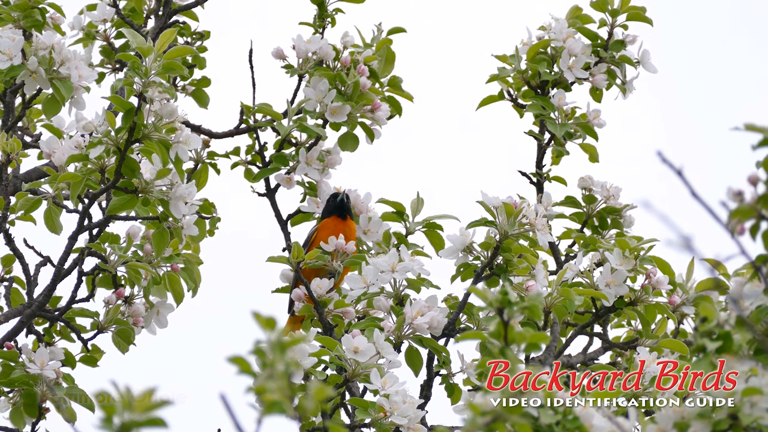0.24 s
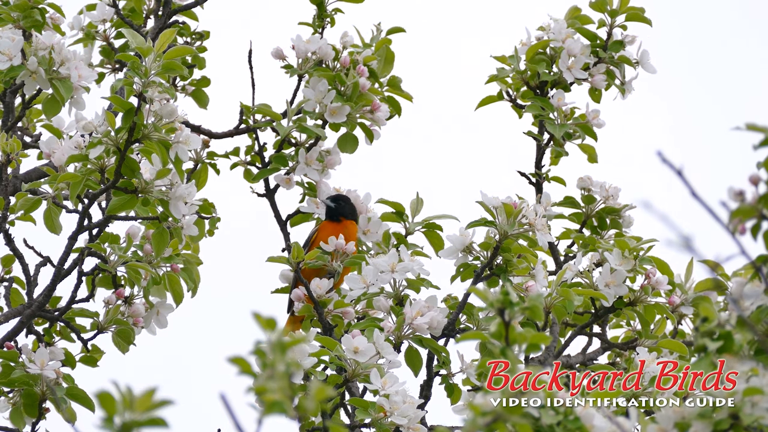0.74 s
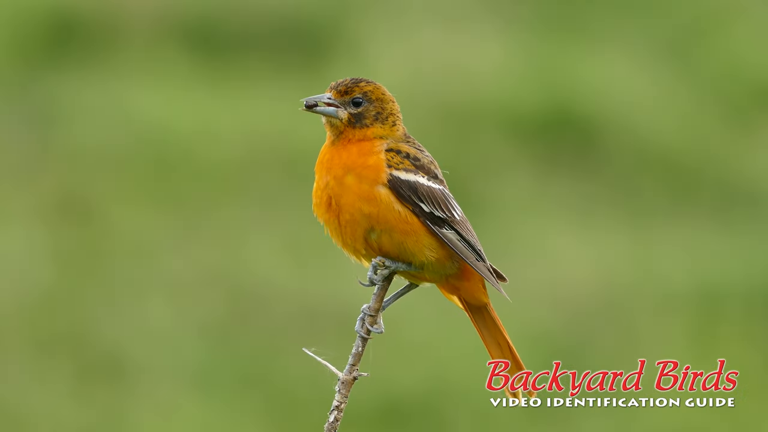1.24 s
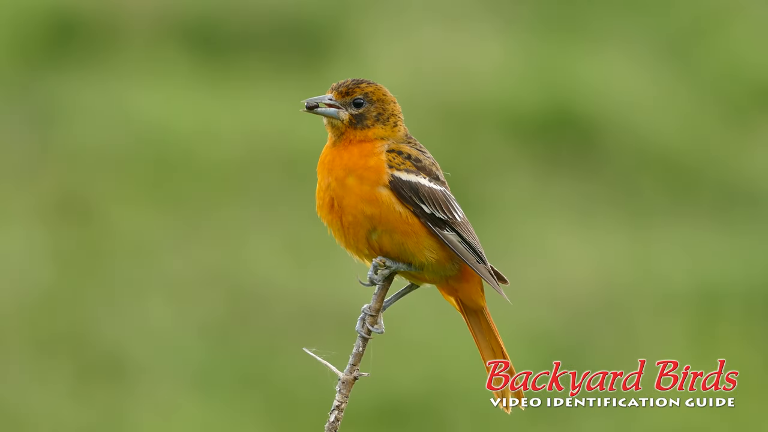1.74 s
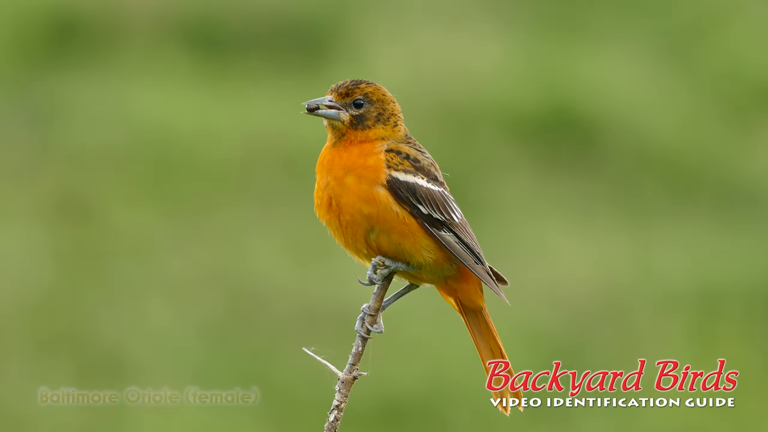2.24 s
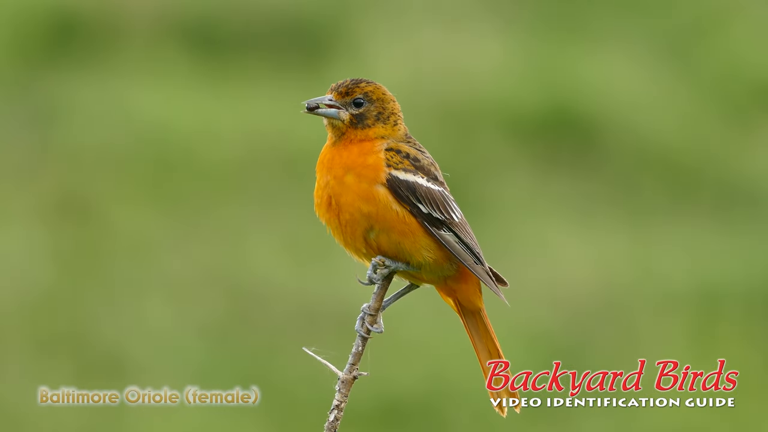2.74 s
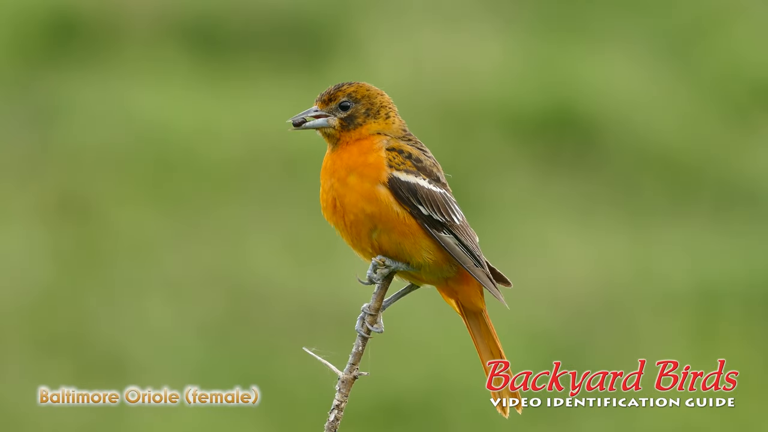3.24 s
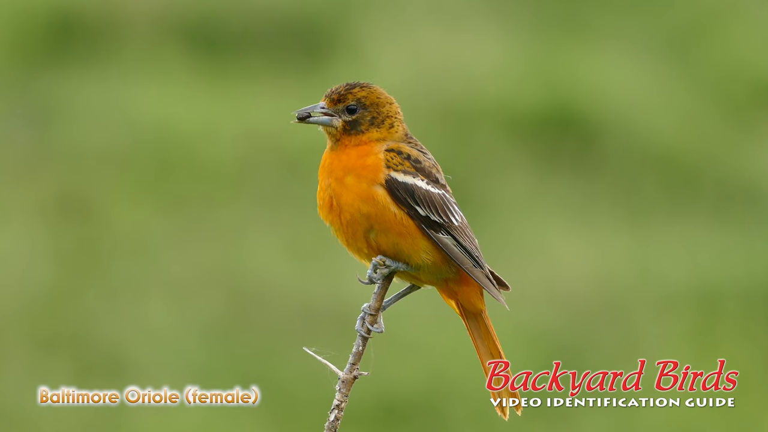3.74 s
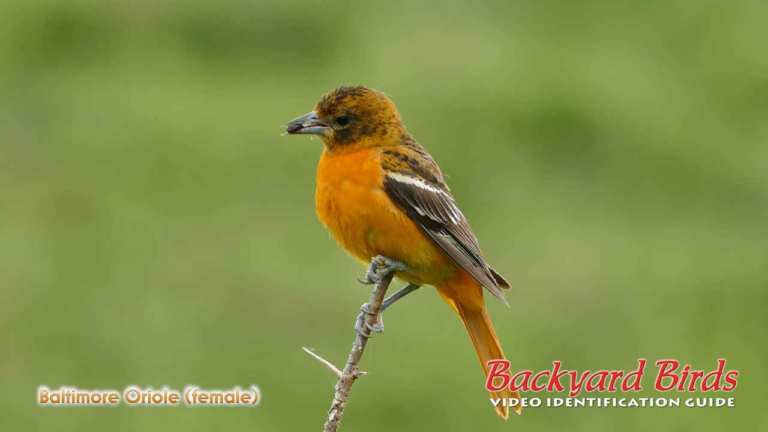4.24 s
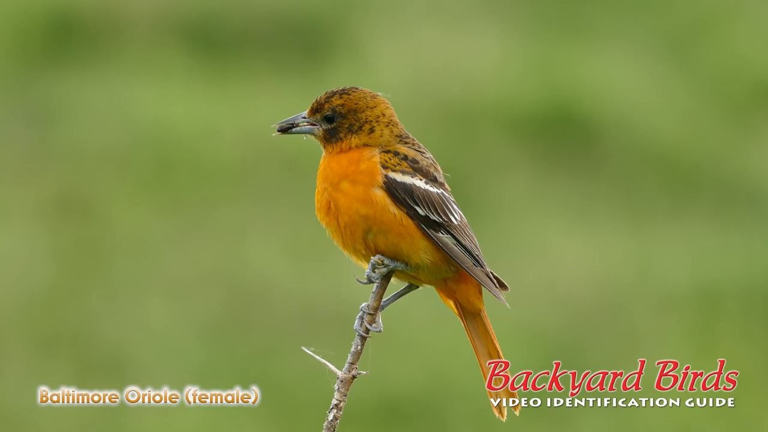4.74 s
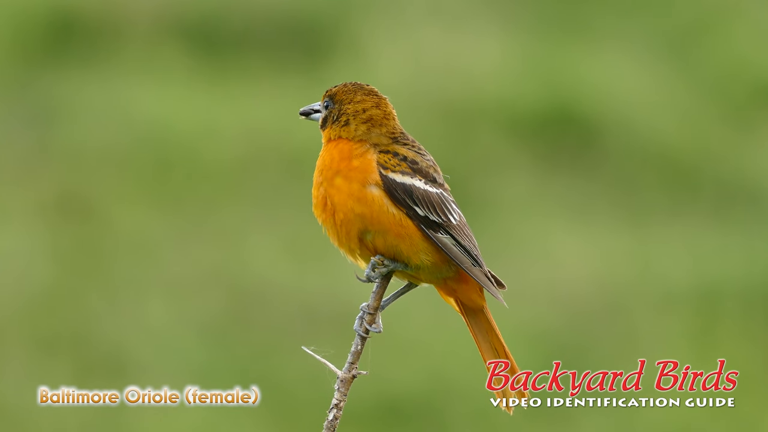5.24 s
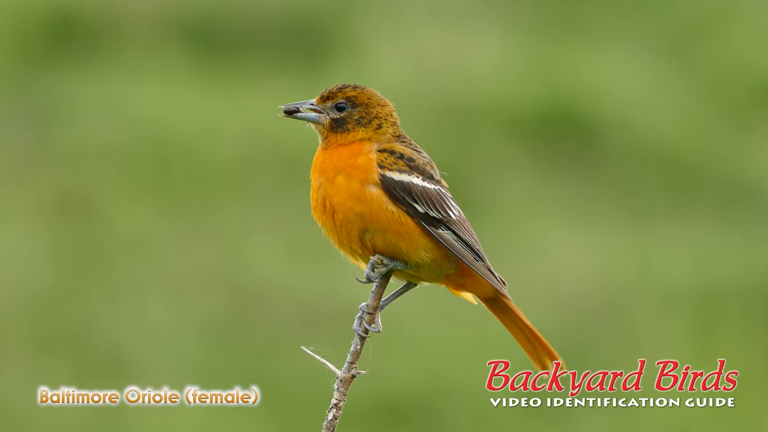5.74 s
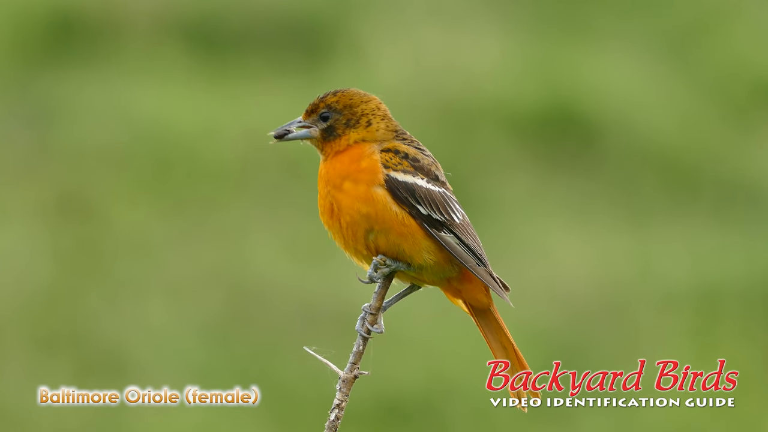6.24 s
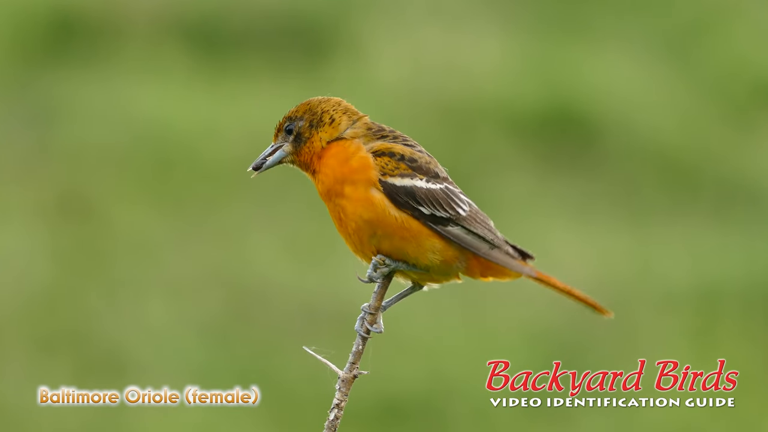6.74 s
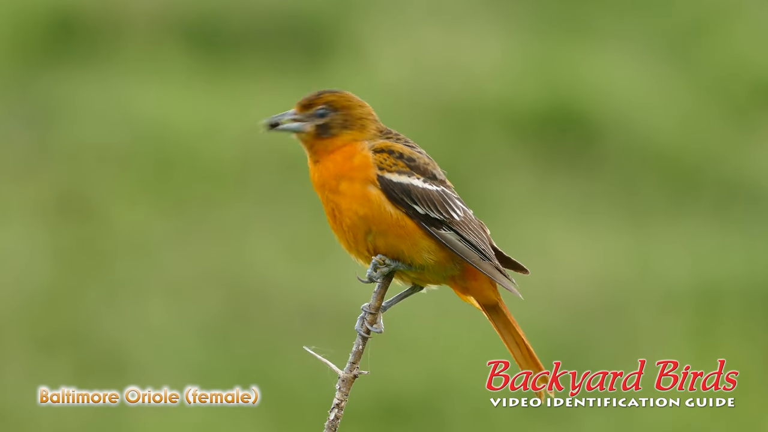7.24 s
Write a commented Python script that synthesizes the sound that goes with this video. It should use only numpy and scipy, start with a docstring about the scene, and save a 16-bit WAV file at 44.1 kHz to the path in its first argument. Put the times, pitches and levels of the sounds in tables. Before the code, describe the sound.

At 0 s a close songbird utters two quick, clear whistles in a softly echoing grove, with thin chirps and buzzes far behind. Quiet, faint air follows until about 1.1 s, when a small click and abrupt cut open on a dry rapid rattle of eight pulses, lasting 0.2 s, with rough buzzing; the grove now sits left of centre. Sliding flutelike whistles return at 1.7-2.0 s, a longer wavering one at 2.6-2.85, then a lively run from 3.2 to 4.3. At 3.43 a wide wash switches in: low traffic-like rumble, hiss and shimmering high insects. Two similar held whistles come at 4.35 and 4.65, final swoops at 4.9-5.2. Then four short hooked calls at right (5.4-5.9), distant hoarse caws at left (5.75, 6.5), a rising chip trill in the centre (6.6-7.25), a last chirp near 7.45, while the rumble swells.

```python
"""A songbird close to the microphone whistles gliding notes over farther pipes, buzzes and trills in a grove.
Whistles are swept sines, the singer's with overtones; buzzes are chopped tone and breath, caws shaky ladders.
Sparse taps make the grove echo. Its mono track is spliced once and from there sits left of centre.
Later a wide stereo meadow switches in under it: a low traffic-like wash, a hiss and a band of insects,
all shaped noise, with birds to the right, in the middle and, distant and hoarse, on the left."""
import sys
import numpy as np
from scipy import signal
from scipy.io import wavfile
from scipy.ndimage import uniform_filter1d

SR = 44100
rng = np.random.default_rng(int(sys.argv[2]) if len(sys.argv) > 2 else 0)


def int16_out(signal):
    """Quantize to a 16-bit WAV file."""
    q = np.round(np.clip(np.atleast_2d(signal).T, -1, 1) * 32767)
    wavfile.write(sys.argv[1], SR, q.astype(np.int16))


N = 330750

SPLICE_S, MEADOW_START_S = 1.0935, 3.43
SPLICE_CLICK_DB = -33
LEFT_MINUS_RIGHT_DB = 4.4  # grove, after the splice
BAND_EDGE_HZ = 15680

# Grove air spectrum. Each row: frequency in Hz, relative density in dB per Hz.
GROVE_SPECTRUM = [(290, -33), (500, -10.5), (686, -9), (759, -12.5), (1580, -19.5), (2330, -20.5),
                  (2970, -19.5), (5680, -25), (15500, -30.5)]
GROVE_AIR_DB = -64.5  # before it is placed left of centre
# Low murmur of the grove, of which only the departure from the mean counts. Each row: time in s, level in dB.
GROVE_MURMUR = [(0.0, -77), (0.66, -74), (3.4, -78.5)]
# Low cut on the grove air, creeping up and restarting at the splice. Each row: time in s, cut in Hz.
GROVE_LOW_CUT = [(0, 136.6), (.3, 200), (.55, 364), (.9, 454), (1.09, 522), (1.1, 356), (1.8, 363),
                 (2.8, 492), (7.5, 483)]
# Echo decay among the trunks. Each row: frequency in Hz, time to fall 60 dB in s.
GROVE_DECAY = [(1500, 0.94), (2200, 1.01), (2800, 1.084), (3300, 1.16), (3800, 1.23), (6000, 0.43),
               (12000, 0.33)]
ECHO_PATCHY_DB = 3  # clumps of trunks make the tail uneven

# Meadow wash before its reflection. Each row: frequency in Hz, relative density in dB per Hz.
MEADOW_SPECTRUM = [(20, -22), (60, -6), (200, 1), (600, -8.5), (1400, -20.5), (2400, -19.5), (3250, -15.5),
                   (3500, -7.5), (6500, -5.5), (9000, -8.5), (11000, -13), (14000, -14), (15600, -20)]
# Stereo width of the wash. Each row: frequency in Hz, left-right correlation from -1 to 1.
MEADOW_LIKENESS = [(60, 0.81), (130, 0.022), (290, 0.874), (640, 0.64), (1410, 0.53), (3100, 0.45),
                   (6820, 0.33), (15000, -0.32)]
# Lean of the wash. Each row: frequency in Hz, left minus right in dB.
MEADOW_LEAN = [(60, 4.5), (180, -4.5), (550, -3.5), (1650, 0.5), (4970, -1.0), (15000, 0)]
# Distant mid wash and deep rumble. Each row: time in s, mid offset in dB, rumble offset in dB.
MEADOW_SWELL = [(3.45, 0.5, 2), (4.3, -1.5, 9), (5.3, -0.5, 1), (6.2, 6.5, 4), (6.8, 9.5, 15.5),
                (7.5, 10, 17)]
# Insect band. Each row: frequency in Hz, relative density in dB per Hz.
INSECT_SPECTRUM = [(6750, -16), (7050, -3.5), (7350, -1.5), (8100, -4.5), (8400, -10), (8900, -46.5)]
MEADOW_DB, INSECTS_DB = -41.5, -38.5

# Distant hoarse caws on the left. Each row: start in s, end in s, pitch in Hz, level in dB.
CAWS = [(5.736, 6.007, 283.4, -55.5), (6.472, 6.753, 283, -49.5)]
# Throat of the caws. Each row: multiple of the pitch, relative level in dB.
CAW_THROAT = [(4, -11), (5, 6), (6, -6), (7, -7.5)]
# Throat of a nasal call in the grove. Each row: multiple of the pitch, relative level in dB.
NASAL_THROAT = [(5, -2), (6, 0.5), (7, -5), (8, -6), (9, -7), (10, -5), (11, -7), (13, -2), (14, -7.5),
                (17, -15), (18, -15)]
# A bird to the right repeats one call. Each row: start in s, length in s, reference pitch in Hz, level in dB.
RIGHT_CALLS = [(5.417, .05, 2479, -62), (5.545, 0.056, 2610, -51.5), (5.678, 0.058, 2530, -47),
               (5.825, .047, 2274, -45)]
# That call creeps up, leaps to its top and drops.
# Each row: share of the length, share of the reference pitch, level offset in dB.
HOOK = [(0, .77, -3), (.36, .82, 0.5), (.6, 0.97, 2.5), (.7, .98, 0.5), (1, 0.648, 0)]
# Meadow birds in the middle. Each row: start in s, length in s, first pitch in Hz, turn as a share of the
# length, turning pitch in Hz, last pitch in Hz, peak as a share of the length, peak level in dB.
MIDDLE_NOTES = [(6.07, 0.0226, 6650, 0.91, 4950, 4900, .64, -42.5),
                (7.422, 0.024, 2990, 0.089, 3080, 5400, .7, -45),
                (7.441, 0.011, 3000, .1, 3100, 5300, 0.68, -41),
                (7.451, .013, 2900, 0.086, 3040, 5400, 0.89, -36.5),
                (7.461, 0.046, 3100, 0.15, 3620, 2140, 0.56, -35.5)]
# Trill, chip by chip. Each entry: level at the chip's centre in dB.
TRILL_LEVELS = [-48, -39, -43.5, -42.5, -42, -43, -44, -41, -41.5, -42, -40.5, -47]
TRILL_START_S, CHIPS_PER_S = 6.619, 17.82
TRILL_FIRST_HZ, TRILL_CLIMB_HZ_PER_S = 4778, 2300

# Farther grove birds. Each row: start in s, length in s, first pitch in Hz, turn as a share of the length,
# turning pitch in Hz, last pitch in Hz, peak as a share of the length, peak level in dB.
FAR_NOTES = [ (0.06, 0.036, 5950, .4, 6800, 6420, 1, -48), (0.09, .065, 6260, 0.47, 6150, 4700, 0.4, -41.5),
             (0.145, 0.1, 4200, 0.62, 3860, 3740, .3, -53.5),
             (0.637, 0.038, 2150, 0.63, 2250, 2260, 0.5, -61.5),
             (0.697, 0.072, 1930, .6, 1945, 1872, 1, -61.5),
             (0.745, 0.033, 3760, 0.75, 4630, 4660, 0.4, -51),
             (0.768, 0.16, 4660, 0.5, 5340, 5295, 0.3, -60.5),
             (0.79, 0.067, 1946, .9, 1850, 1840, 0.1, -62),
             (0.904, 0.0057, 3650, .52, 3710, 3670, .52, -49.5),
             (0.961, .01, 4630, .1, 4460, 4170, .45, -62),
             (1.016, 0.0096, 3400, 0.11, 3350, 3490, .45, -57),
             (1.019, 0.014, 4400, .52, 4550, 4330, .48, -58),
             (1.058, 0.0095, 3320, .8, 3440, 3440, .55, -50), (1.068, 0.014, 2920, .8, 2940, 2920, .4, -57),
             (1.082, 0.016, 4480, .9, 4530, 4560, .85, -56),
             (1.384, 0.013, 5400, 0.84, 4400, 4300, 0.2, -48),
             (1.385, 0.12, 7100, 0.4, 7620, 7330, 1, -43.5), (1.479, .016, 7350, 0.2, 7380, 6010, .2, -42),
             (1.575, .012, 5960, .7, 7536, 7400, .67, -53.5),
             (1.615, 0.039, 5860, 0.5, 7000, 5900, 0, -44.5), (1.645, .045, 5990, .9, 5670, 5620, .8, -45),
             (2.172, 0.055, 3590, .95, 5018, 4930, .65, -51.5),
             (2.221, .13, 5100, 0.7, 5212, 5014, 0.41, -64.5),
             (2.31, 0.019, 5170, 0.46, 5130, 4950, 0.05, -48),
             (2.481, 0.13, 1720, 0.09, 1700, 1587, 0.05, -62.5),
             (2.853, 0.066, 1700, .6, 1720, 1660, .15, -69.5),
             (3.22, 0.065, 1694, 0.7, 1736, 1740, 0.3, -66),
             (4.962, .135, 7430, .3, 7510, 7040, 0.5, -36.5),
             (4.105, 0.078, 5230, 0.63, 5400, 4900, 0.39, -49),
             (5.196, 0.057, 6284, 0.47, 6150, 4700, 0, -40), (5.275, .03, 4070, .8, 3900, 4000, .4, -46.5),
             (5.32, .04, 3880, 0.53, 3750, 3870, .35, -53.5), ]
# Rough calls. Each row: start in s, end in s, centre in Hz, width in Hz, pulses per second,
# noisiness from 0 to 1, level before the swell in dB.
BUZZES = [(0.0, 0.03, 7160, 396, 200, 0.7, -52), (0.045, 0.154, 6880, 2500, 180, 0.7, -49.5),
          (1.094, 1.367, 3220, 920, 41.4, 0.8, -44.5), (1.09, 1.306, 4960, 563, 99, 0.96, -52),
          (1.331, 1.362, 4130, 2200, 200, 1, -43.5), (0.593, 0.709, 850, 400, 57.4, 0.85, -64),
          (1.094, 1.324, 4070, 694, 100, .95, -65), (3.865, 3.893, 3300, 1213, 220, .8, -43),
          (1.41, 1.503, 6200, 700, 170, 0.8, -54), (1.423, 1.485, 8400, 900, 160, 1, -58),
          (1.558, 1.584, 3810, 1810, 227, 1, -44.5), (1.561, 1.583, 8800, 1200, 210, .9, -63),
          (1.628, 1.695, 7080, 913, 170, 0.9, -52), (2.437, 2.625, 4580, 494, 83, 1, -53),
          (2.785, 2.88, 6580, 500, 167, 0.71, -49.5), (2.79, 2.897, 5500, 800, 130, 0.45, -51.5)]
# Chatter pulses from the splice on, fading at the end
CHATTER_PER_S, CHATTER_HZ, CHATTER_PITCH_SPREAD = 41.4, 2590, 0.016  # spread as a share of the pitch
CHATTER_DB, CHATTER_FADE_DB = -29.5, -2

# The singer's notes. Each row: start in s, length in s, first pitch in Hz, turn as a share of the length,
# turning pitch in Hz, last pitch in Hz, bend (power of the glide, 1 is straight), peak as a share of the
# length, peak level in dB, overtone offset in dB.
SONG_NOTES = [ (-0.016, 0.0629, 2596, 0.35, 2928, 2577, 1.3, 0.67, -18.5, -3),
              (0.036, 0.054, 2875, 0.24, 3303, 2280, .7, 0.57, -17, 1),
              (1.769, 0.047, 2274, 0.61, 2365, 1590, 1.55, 0.66, -23.5, -5),
              (1.889, 0.0512, 2646, .52, 2900, 2600, 1.4, 0.84, -20.5, -0.5),
              (1.934, 0.048, 2910, 0.28, 3350, 2284, 1.18, 0.74, -19, -1.5),
              (3.224, 0.028, 5220, 0.8, 3510, 3520, 3.3, 0.63, -21.5, -7),
              (3.323, 0.022, 4800, 0.53, 4080, 3400, 0.96, 1, -41, -10),
              (3.35, .046, 2760, 0.8, 3990, 3910, 1.33, 0.88, -19.5, 1),
              (3.585, 0.0471, 2720, 0.77, 4003, 3930, 1.19, 0.62, -18.5, -10.5),
              (3.863, 0.033, 1339, 0.78, 1913, 1860, 2.1, 0.9, -33, -10.5),
              (3.918, 0.0272, 1780, 0.36, 1520, 1536, 1.38, .52, -46.5, -10.5),
              (3.913, 0.038, 3220, 0.29, 3225, 2010, 1.95, 0.83, -31.5, -10.5),
              (4.004, 0.087, 2675, 0.44, 3006, 1875, 1.84, 0.58, -23, -3),
              (4.179, 0.1, 2700, .45, 2896, 2340, 2.4, 0.76, -16.5, -10.5),
              (4.877, 0.073, 2324, 0.5, 3270, 2440, 1.11, 0.49, -17.5, -5),
              (4.973, 0.043, 2110, 0.56, 2385, 1460, 2.1, 0.57, -22.5, -1),
              (5.085, 0.066, 2590, 0.41, 2913, 2584, 1.3, 0.85, -18, -9),
              (5.146, 0.047, 2870, 0.18, 3295, 2197, 0.88, 0.5, -16.5, -1), ]
# Short falls from the second half of the voice box, under a note of the first. Each row: start in s, length
# in s, first pitch in Hz, turn share, turning pitch in Hz, last pitch in Hz, bend, peak share, peak in dB,
# overtone offset in dB.
SECOND_VOICE_NOTES = [ (1.806, 0.0156, 4770, 0.46, 3000, 1698, 0.91, 1, -30.5, -8.5),
                      (3.478, 0.015, 2650, 0.56, 2350, 2040, 0.55, .2, -36, -10.5),
                      (4.042, .038, 2380, 0.244, 2496, 1795, 1.723, 0.49, -25, -8),
                      (4.25, .022, 2240, .1, 2250, 1910, 1.2, 0.33, -34.5, -8)]
# Long wavering notes. Each row: overtone offset in dB, then points of time in s, pitch in Hz, level in dB.
WARBLES = [ (2, [(1.672, 2520, -47), (1.69, 2646, -27.5), (1.708, 3176, -19), (1.718, 3023, -20.5),
           (1.732, 2590, -23), (1.756, 2010, -47)]), (2, [(2.576, 2460, -39), (2.59, 2682, -28),
           (2.63, 2715, -30.5), (2.66, 2700, -22.5), (2.694, 3050, -21), (2.716, 2705, -16.5),
           (2.742, 2514, -20.5), (2.804, 2311, -25), (2.85, 2194, -40.5)]), (8.5, [(3.402, 3590, -33),
           (3.436, 3426, -18), (3.45, 3311, -27.5), (3.466, 3267, -16.5), (3.49, 3000, -22),
           (3.498, 2665, -20), (3.504, 2440, -37)]), (1, [(3.642, 2890, -51), (3.65, 2794, -22),
           (3.67, 2828, -16.5), (3.686, 2800, -17.5), (3.726, 2544, -21), (3.748, 2710, -18),
           (3.756, 2950, -31), (3.762, 2780, -52.5)]), ]
# Two held notes that settle onto one pitch. Each row: start in s, length in s, peak level in dB.
HELD_NOTES = [(4.354, 0.157, -20.5), (4.639, 0.16, -20.5)]
# Third and higher partials against the singer's tone. Each row: the partial's frequency in Hz, level in dB.
WINDPIPE = [(6000, -54.5), (7500, -59), (8500, -41), (10000, -41.5), (11000, -42), (13000, -54.5),
            (16000, -52.5)]
# Second partial against the singer's tone. Each row: the partial's frequency in Hz, level in dB.
SECOND_PARTIAL = [(3000, -23), (4400, -38), (4800, -25.5), (5400, -31), (6200, -34), (7200, -24.5),
                  (8200, -34)]
SECOND_PARTIAL_FOLLOWS = 0.32  # share of a note's overtone offset that it takes
SUM_TONE_DB = 13.5  # gain on the product of the two voices
WAVER_DB, WAVER_PITCH = .9, .0012  # RMS; the pitch as a share; the singer is never quite steady
# How a note swells: dB under the peak at the start, power of the rise, dB under at the end, power of the fall
NEAR_SWELL, FAR_SWELL, HELD_SWELL = (16, 1.8, 14.4, 2.12), (9.7, 2.5, 8.6, 1.27), (20, 3, 7.1, 8.8)


def gain_of(db):
    """Amplitude factor for a level in dB."""
    return 10 ** (np.asarray(db) / 20)


def unit_rms(x):
    """Scale to an RMS of one."""
    return x / np.sqrt(np.mean(x ** 2) + 1e-20)


def read(points, hz):
    """Read a frequency table along a logarithmic axis."""
    f, value = np.transpose(points)
    return np.interp(np.log(hz + 1), np.log(f + 1), value)


def add(mix, start_s, sound):
    """Lay a sound into the mix, trimmed at both ends."""
    at = round(start_s * SR)
    sound = sound[max(-at, 0):]
    part = mix[max(at, 0):][:len(sound)]
    part += sound[:len(part)]


def noise(shape_db, likeness, patchy_db, size=1024):
    """Two channels of random short-time spectra with drifting patches; shape_db takes (Hz, s)."""
    hop = size // 4
    frames, hz = N // hop + 5, np.fft.rfftfreq(size, 1 / SR)[:, None]
    a, b, c, d, patches = rng.standard_normal((frames, len(hz), 5)).T
    patches = uniform_filter1d(patches, 12, axis=0)
    patches = unit_rms(uniform_filter1d(patches, 14, axis=1))
    same = np.clip(likeness(hz), -1, 1)
    left, other = a + 1j * b, c + 1j * d
    spectra = np.array([left, same * left + np.sqrt(1 - same ** 2) * other])
    level_db = shape_db(hz, np.arange(frames) * hop / SR) + patchy_db * patches
    sound = signal.istft(spectra * gain_of(level_db), nperseg=size, noverlap=size - hop)[1]
    return unit_rms(sound[:, :N])


def grove_air():
    """Faint mono air of the grove: shaped noise with a swelling low murmur, steeply cut below the low cut."""
    def shape_db(hz, t):
        s, db = np.transpose(GROVE_MURMUR)
        murmur_db = (np.interp(t, s, db) - db.mean()) / (1 + (hz / 1500) ** 2)
        under_hz = np.interp(t, *np.transpose(GROVE_LOW_CUT)) - hz
        cut_db = np.clip(under_hz * 3.2, 0, 60)
        return read(GROVE_SPECTRUM, np.maximum(hz, 520)) + murmur_db - cut_db
    return gain_of(GROVE_AIR_DB) * noise(shape_db, np.ones_like, patchy_db=0.5)[0]


def meadow_wash():
    """Wide shaped noise combed by a short reflection, its mid wash and deep rumble swelling separately."""
    def shape_db(hz, t):
        bounce = .95 * np.exp(-hz / 3000 - 2j * np.pi * hz * .0025)  # inverted, 2.5 ms late
        comb_db = 20 * np.log10(abs(1 - bounce) + .01)
        s, mid_db, deep_db = np.transpose(MEADOW_SWELL)
        mid = np.exp(-(np.log((hz + 1) / 1500) / .5) ** 2)
        deep = 1 / (1 + (hz / 90) ** 4)
        swell_db = mid * np.interp(t, s, mid_db) + deep * np.interp(t, s, deep_db)
        lean_db = read(MEADOW_LEAN, hz) / 2
        return read(MEADOW_SPECTRUM, hz) + comb_db + swell_db + np.array([lean_db, -lean_db])
    return gain_of(MEADOW_DB) * noise(shape_db, lambda hz: read(MEADOW_LIKENESS, hz), patchy_db=1.18)


def insects():
    """A shimmering band of noise, nearly independent in the two channels and a little to the right."""
    def shape_db(hz, t):
        return read(INSECT_SPECTRUM, hz) - 60 * ((hz < 6700) | (hz > 8900))
    band = noise(shape_db, lambda hz: 0.11 + 0 * hz, patchy_db=0.5, size=256)
    return gain_of(INSECTS_DB) * gain_of([[-.8], [.8]]) * band


def meadow():
    """Wash and insects, switched in within a millisecond."""
    switch = np.clip((np.arange(N) / SR - MEADOW_START_S) / 0.00087, 0, 1)
    return switch * (meadow_wash() + insects())


def echoes(x):
    """Trunks and leaves: sparse taps of random sign, each band dying at its own speed."""
    taps = np.zeros(SR)
    at = np.arange(400, SR - 20, 20)
    taps[at + rng.integers(0, 20, len(at))] = rng.choice([-1., 1.], len(at))
    hz, t, bands = signal.stft(taps, SR, nperseg=256)
    early = 1 + gain_of(18.0) * np.exp(-t / 0.016)  # nearby branches answer first and loudest
    clumps = uniform_filter1d(rng.standard_normal(bands.shape), size=2, axis=0)
    clumps = unit_rms(uniform_filter1d(clumps, size=8))
    decay = gain_of(-60 * t / read(GROVE_DECAY, hz)[:, None])
    bands = bands * gain_of(ECHO_PATCHY_DB * clumps) * early * decay
    tail = signal.istft(bands, SR, nperseg=256)[1]
    return signal.fftconvolve(x, tail / np.linalg.norm(tail))[:N]


def glide(start, length, first_hz, turn, turn_hz, last_hz, bend, peak, peak_db, swell):
    """Points of time, pitch and level: pitch bends round its turning point, level round its peak."""
    u = np.linspace(0, 1, num=60)
    rise_db, rise, fall_db, fall = swell
    turn, peak = np.clip([turn, peak], .02, .98)
    before, after = np.maximum(1 - u / turn, 0), np.maximum((u - turn) / (1 - turn), 0)
    hz = turn_hz + (first_hz - turn_hz) * before ** bend + (last_hz - turn_hz) * after ** bend
    rising, falling = np.maximum(1 - u / peak, 0), np.maximum((u - peak) / (1 - peak), 0)
    under_db = rise_db * rising ** rise + fall_db * falling ** fall
    return np.transpose([start + u * length, hz, peak_db - under_db])


def unsteady(hz, db):
    """Slow random wavering of the singer's pitch and level."""
    slow = uniform_filter1d(rng.standard_normal((2, len(hz))), 400)
    pitch_waver, level_waver = [unit_rms(uniform_filter1d(v, 400)) for v in slow]
    return hz * (1 + WAVER_PITCH * pitch_waver), db + WAVER_DB * level_waver


def voiced(turn, hz, db, rich_db, t):
    """The singer's sine with fluttering overtones up to the sixth partial, rasping on low pitches."""
    tone = np.sin(turn)
    growth_db = .7 * (db - db.max())  # upper overtones show near the loudest part of a note
    for k in range(2, 7):
        flutter_db = 3 * unit_rms(uniform_filter1d(rng.standard_normal(len(t)), 250))
        if k == 2:
            partial_db = read(SECOND_PARTIAL, k * hz) + SECOND_PARTIAL_FOLLOWS * rich_db
        else:
            partial_db = read(WINDPIPE, k * hz) + rich_db + growth_db
        audible = k * hz < SR / 2
        tone = tone + gain_of(partial_db + flutter_db) * np.sin(k * turn) * audible
    rasp = .45 * np.clip((2080 - hz) / 200, 0, 1)
    return tone * (1 + rasp * np.sin(2 * np.pi * (230 * t + rng.random())))


def whistle(points, rich_db=None):
    """A sine on a gliding pitch; an overtone offset in dB gives it the singer's voice."""
    s, hz, db = np.transpose(points)
    t = np.arange(s[0], s[-1], 1 / SR)
    hz = uniform_filter1d(np.interp(t, s, hz), 90)
    db = uniform_filter1d(np.interp(t, s, db), 90)
    if rich_db is not None:
        hz, db = unsteady(hz, db)
    turn = 2 * np.pi * np.cumsum(hz) / SR
    tone = np.sin(turn) if rich_db is None else voiced(turn, hz, db, rich_db, t)
    fade_s = min(.006, len(t) / SR / 4)
    fade = np.minimum(1, np.minimum(t - s[0], s[-1] - t) / fade_s)
    return s[0], np.sqrt(2) * gain_of(db) * tone * np.sin(np.pi / 2 * fade) ** 2


def far_note(start, length, first_hz, turn, turn_hz, last_hz, peak, peak_db):
    """A plain whistle from a distance: one sine without overtones."""
    return whistle(glide(start, length, first_hz, turn, turn_hz, last_hz, 1.5, peak, peak_db, FAR_SWELL))


def caw(start, end, hz, db, throat, shaky, scoop):
    """A few overtones of a shaky pitch that scoops up at the start."""
    t = np.arange(0, end - start, 1 / SR)
    shake = unit_rms(uniform_filter1d(rng.standard_normal(len(t)), 300))
    pitch_hz = hz * (1 + shaky * shake - scoop * np.exp(-t / 0.031))
    turn = 2 * np.pi * np.cumsum(pitch_hz) / SR
    tone = sum(gain_of(level_db) * np.sin(k * turn + k * k) for k, level_db in throat)
    return start, gain_of(db) * unit_rms(tone) * signal.windows.tukey(len(t), .4)


def chip(s, hz, db):
    """A fast downward sweep."""
    return whistle([(s - .007, hz * 1.2, db + 1), (s, hz, db), (s + 0.0068, hz * 0.87, db - 9)])


def trill():
    """Chips at an even pace, climbing in pitch."""
    out = np.zeros(N)
    for k, db in enumerate(TRILL_LEVELS):
        since_s = k / CHIPS_PER_S
        add(out, *chip(TRILL_START_S + since_s, TRILL_FIRST_HZ + TRILL_CLIMB_HZ_PER_S * since_s, db))
    return out


def meadow_birds():
    """Caws left, whistles and trill in the middle, hooked calls right, with unlike echoes per channel."""
    left, right, middle = np.zeros(N), np.zeros(N), trill()
    for row in CAWS:
        add(left, *caw(*row, CAW_THROAT, shaky=0.043, scoop=0.0786))
    for row in MIDDLE_NOTES:
        add(middle, *far_note(*row))
    for start, length, reference_hz, db in RIGHT_CALLS:
        add(right, *whistle(np.multiply(HOOK, [length, reference_hz, 1]) + [start, 0, db]))
    direct = gain_of([[3], [-6]]) * left + gain_of([[.6], [-.6]]) * middle + gain_of([[-7], [4]]) * right
    send = gain_of(-0.5) * left + gain_of(-7.5) * (middle + right)
    return direct + np.array([echoes(send), echoes(send)])


def buzz(start, end, hz, width, rate, noisy, db):
    """A tone and breath noise, both throbbing at the pulse rate, around one band."""
    t = np.arange(0, end - start, 1 / SR)
    throb = .5 - .5 * np.cos(2 * np.pi * rate * t)
    sweep_hz = hz + width * (rate * t % 1 - .5)  # each pulse glides up through the band
    tone = unit_rms(np.sin(2 * np.pi * np.cumsum(sweep_hz) / SR) * throb)
    band = signal.butter(3, [hz - width / 2, hz + width / 2], "band", fs=SR)
    breath = unit_rms(signal.lfilter(*band, rng.standard_normal(len(t)) * (.3 + throb)))
    swell = np.sin(np.pi * t / (end - start)) ** .7
    if start == 0 or abs(start - SPLICE_S) < .01:  # cut into a running call: no rise
        swell = np.where(t < (end - start) / 2, 1, swell)
    return start, gain_of(db) * (np.sqrt(1 - noisy) * tone + np.sqrt(noisy) * breath) * swell


def far_birds():
    """Farther birds of the grove: a nasal ladder of overtones, plain whistles and buzzes."""
    out = np.zeros(N)
    nasal = (1.4, 1.497, 620, -55)  # start s, end s, pitch Hz, level dB
    add(out, *caw(*nasal, NASAL_THROAT, shaky=0.0052, scoop=0.0205))
    for row in FAR_NOTES:
        add(out, *far_note(*row))
    for row in BUZZES:
        add(out, *buzz(*row))
    return out


def pulse(s, db, hz):
    """One chatter pulse: a quick tone that sags in pitch; nothing of it before the splice."""
    t = np.arange(-.002, .014, 1 / SR)
    turn = 2 * np.pi * np.cumsum(hz * (1 + .08 * np.exp(-t / .003))) / SR
    shape = np.sin(np.pi * ((t - t[0]) / .016) ** .75) ** 2
    return s + t[0], gain_of(db) * shape * np.sin(turn) * (s + t >= SPLICE_S)


def chatter(count):
    """An even run of pulses, each a little off in pitch."""
    out = np.zeros(N)
    for k, off in enumerate(rng.standard_normal(count)):
        db = CHATTER_DB + CHATTER_FADE_DB * (k / (count - 1)) ** 4
        hz = CHATTER_HZ * (1 + CHATTER_PITCH_SPREAD * off)
        add(out, *pulse(SPLICE_S - .002 + k / CHATTER_PER_S, db, hz))
    return out


def singer():
    """The near bird: two voices, and their product high-passed to leave the tone at the sum of pitches."""
    first, second = np.zeros((2, N))
    for voice, notes in (first, SONG_NOTES), (second, SECOND_VOICE_NOTES):
        for *shape, rich_db in notes:
            add(voice, *whistle(glide(*shape, NEAR_SWELL), rich_db))
    for rich_db, points in WARBLES:
        add(first, *whistle(points, rich_db))
    for start, length, db in HELD_NOTES:
        held = glide(start, length, first_hz=2340, turn=0.26, turn_hz=2182, last_hz=2140,
                     bend=2.33, peak=0.46, peak_db=db, swell=HELD_SWELL)
        add(first, *whistle(held, rich_db=4.5))
    high = signal.butter(4, 3500, "high", fs=SR)
    sum_tone = signal.lfilter(*high, first * second)
    return first + second + gain_of(SUM_TONE_DB) * sum_tone


def grove_birds():
    """Near singer and chatter mostly dry, far birds wetter."""
    near, rattle, far = singer(), chatter(count=8), far_birds()
    send = gain_of(-13) * rattle + gain_of(-11.0) * near + gain_of(-6.0) * far
    return near + rattle + far + echoes(send)


def scene():
    """The grove, centred and then left of centre from the splice, over the wide meadow."""
    half_db = LEFT_MINUS_RIGHT_DB / 2 * (np.arange(N) >= SPLICE_S * SR)
    place = gain_of([half_db, -half_db])
    grove = grove_birds() + grove_air()
    click = np.exp(-np.arange(40) / 3.2)  # the splice clicks
    add(grove, SPLICE_S, gain_of(SPLICE_CLICK_DB) * click)
    return 2 * place / place.sum(0) * grove + meadow() + meadow_birds()


def record(dry):
    """The band limit: a steep low-pass on both channels."""
    low_pass = signal.firwin(1023, BAND_EDGE_HZ, window=("kaiser", 10), fs=SR)
    return signal.oaconvolve(dry, low_pass[None], "same")


dry = scene()
out = record(dry)
int16_out(out)
```